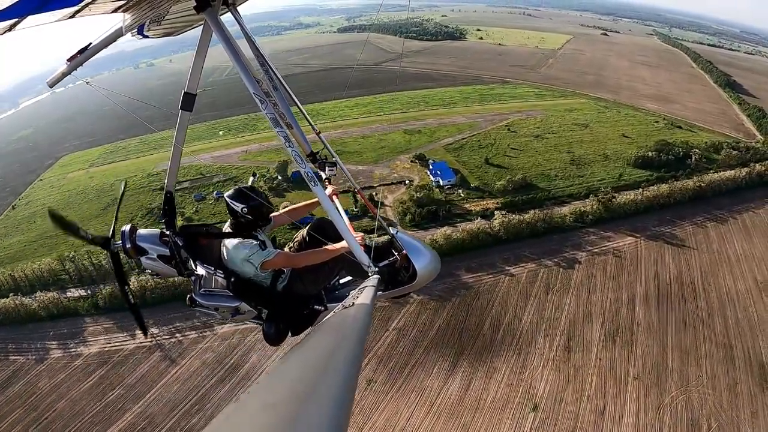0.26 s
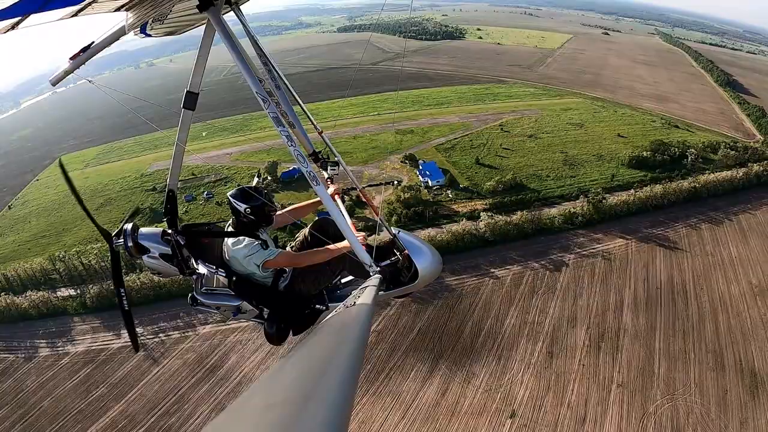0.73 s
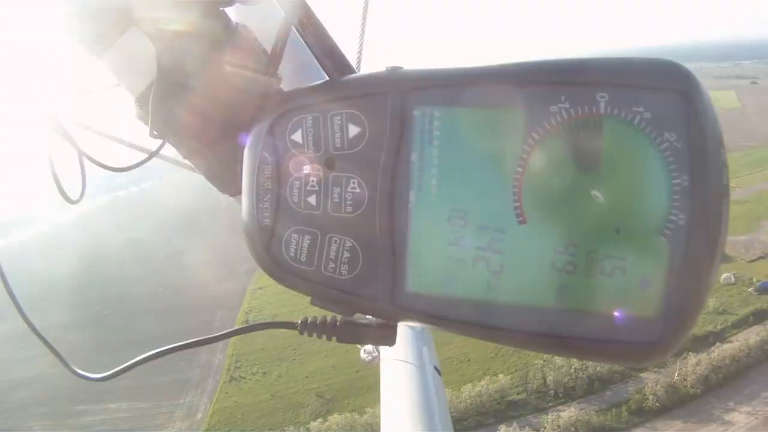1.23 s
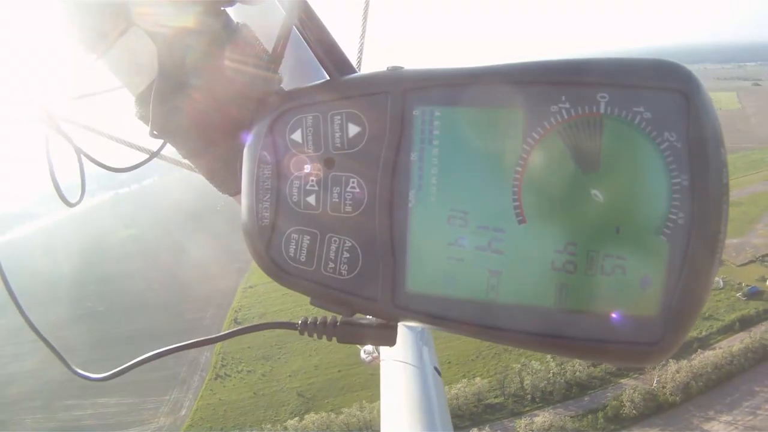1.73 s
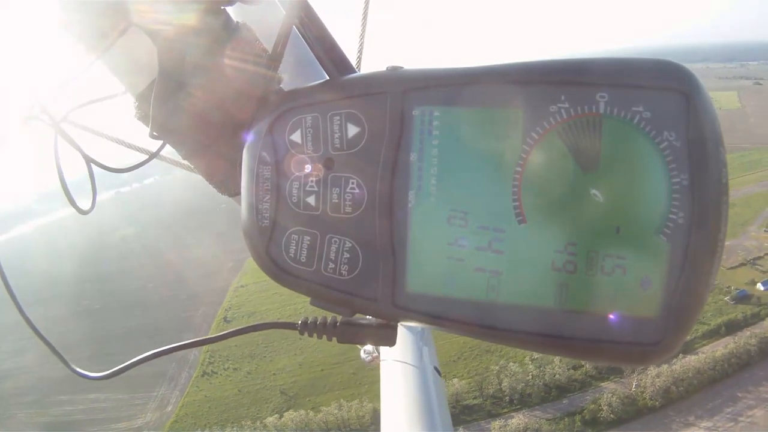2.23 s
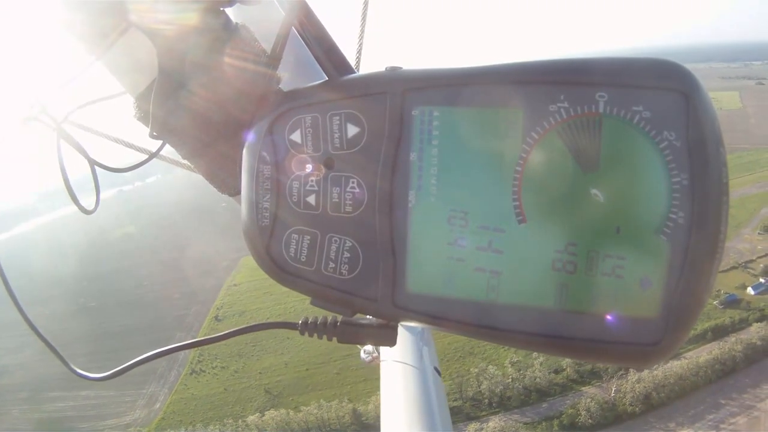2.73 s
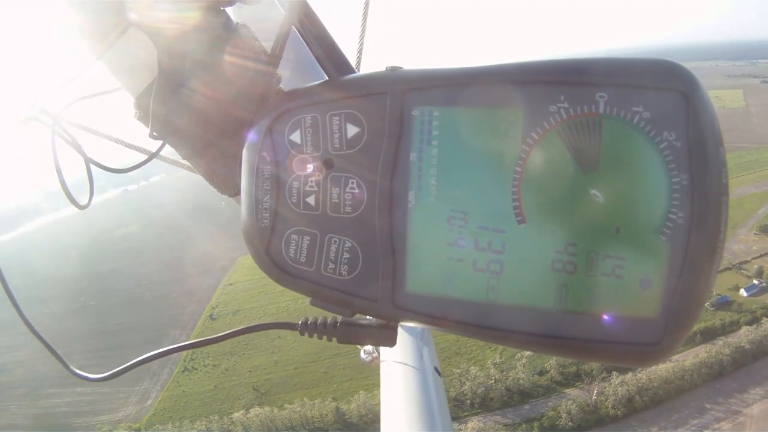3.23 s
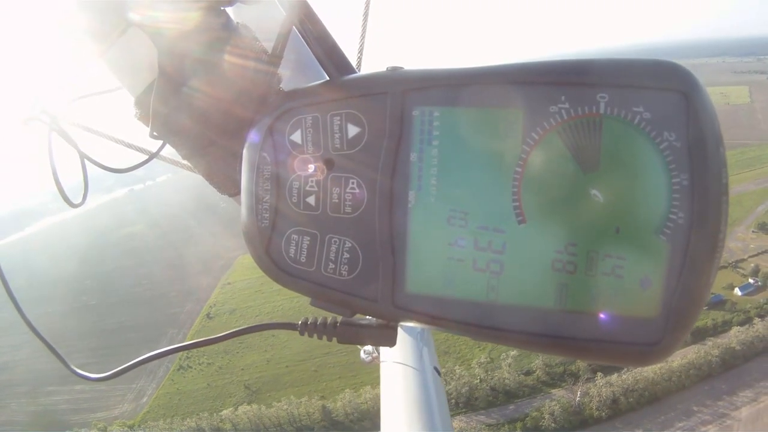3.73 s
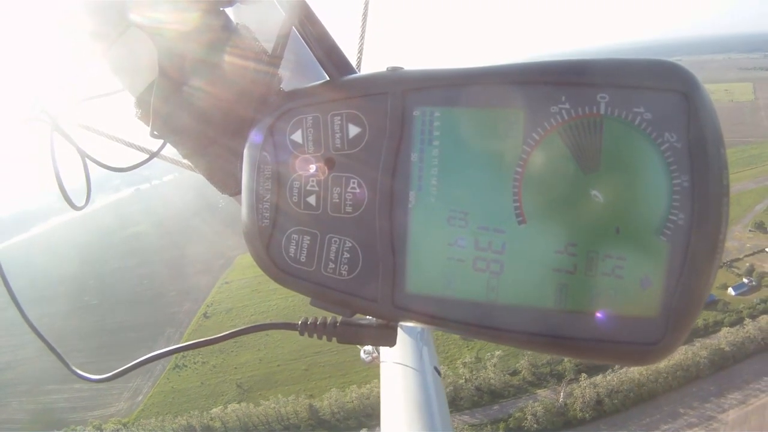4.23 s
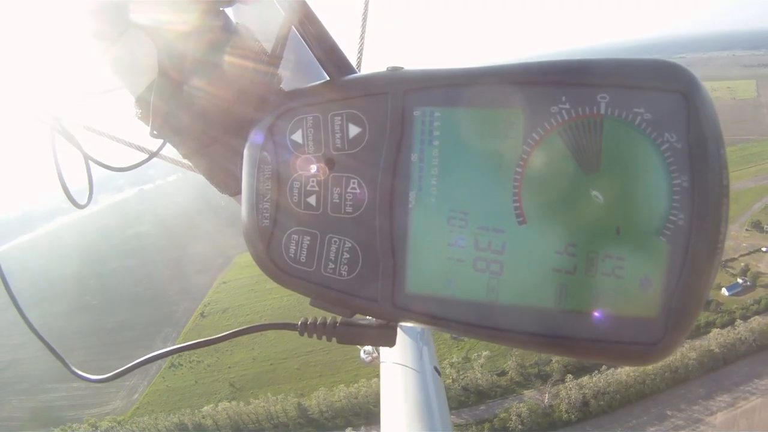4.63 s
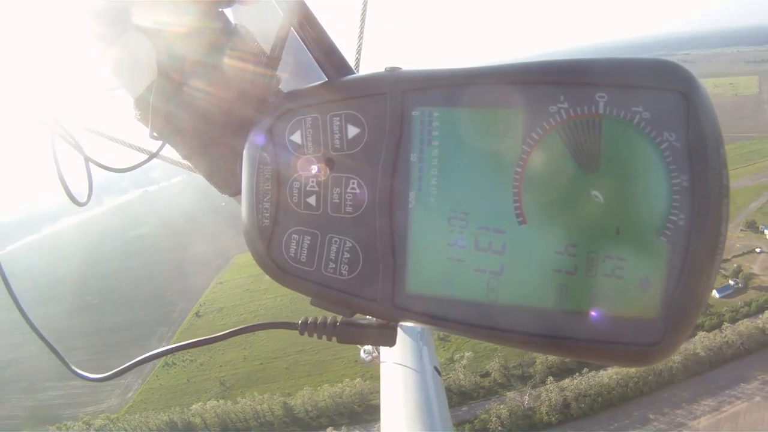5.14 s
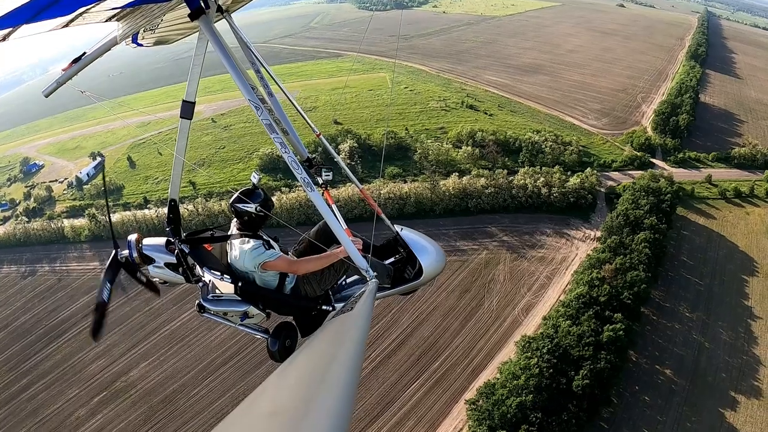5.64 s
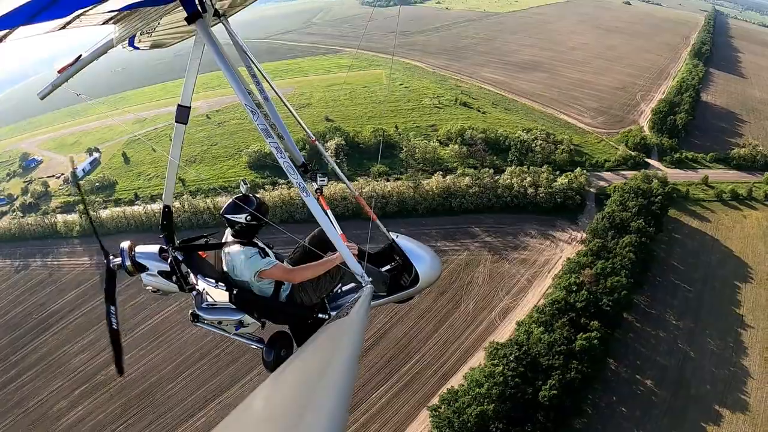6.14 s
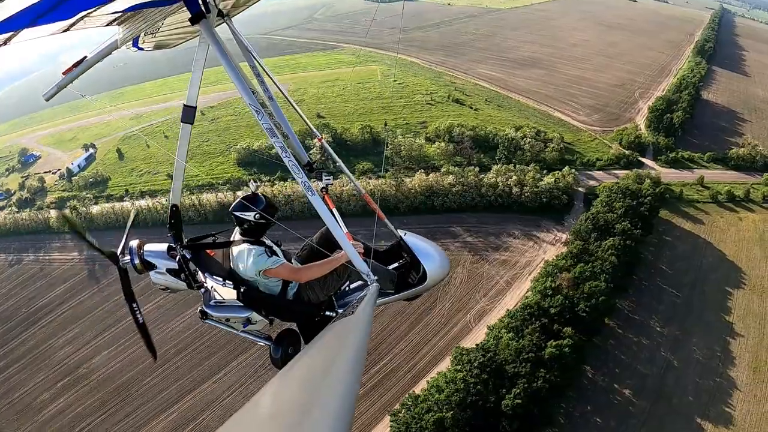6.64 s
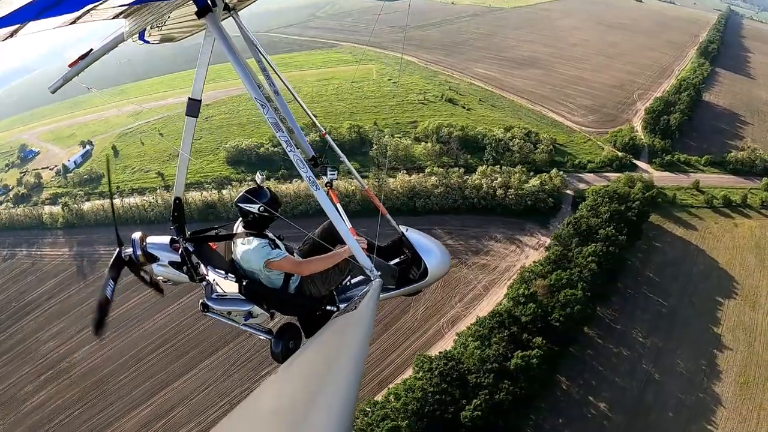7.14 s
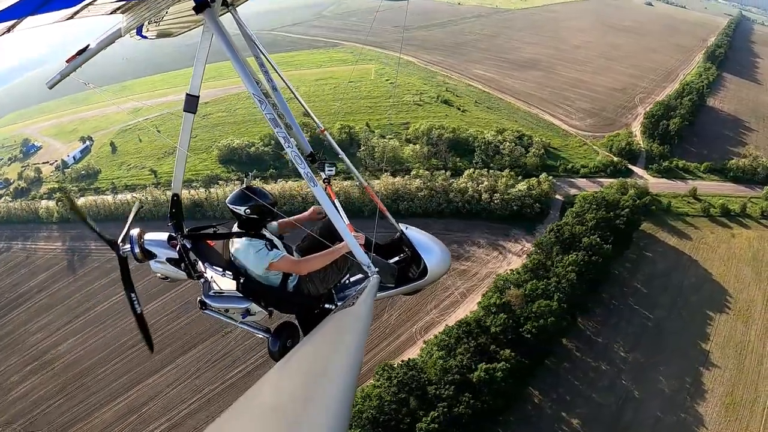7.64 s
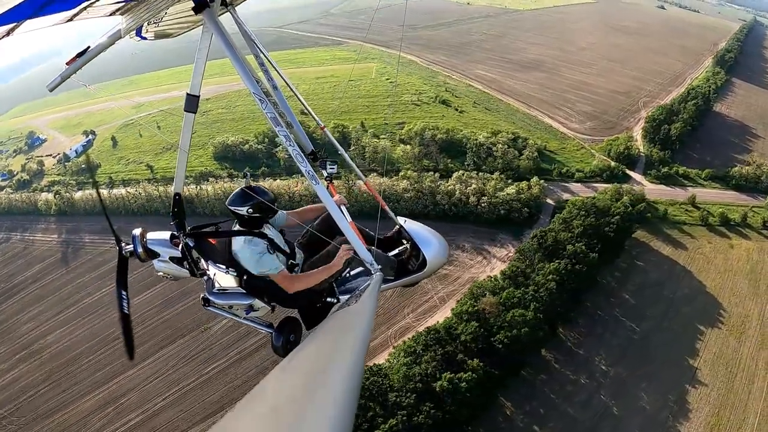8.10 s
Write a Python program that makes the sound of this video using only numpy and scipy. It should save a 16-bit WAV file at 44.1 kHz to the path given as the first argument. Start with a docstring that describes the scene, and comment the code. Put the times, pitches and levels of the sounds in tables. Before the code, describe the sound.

Low, rasping wind overwhelms a microphone out on the wing, with a low unsteady thrum. An abrupt cut moves close to the cockpit, much quieter, where the motor pulses rapidly beneath gritty hiss, brief low hoots and short runs of mount rattle. Another hard cut brings back the loud buffeting, gusty and crackling, with sharp air slaps until the end.

```python
"""A motorised hang-glider trike in flight, heard from the wing, then the cockpit, then the wing again.
Out on the wing, gusts swell the 2 to 4 kHz rasp of octave-band noise; bursts slap, pops crackle, a tone thrums.
In the cockpit, cosines make the propeller shake and the throbbing drive; noise makes rumble, hiss and buzz.
A wavering drone hoots there and a mount rattles in decaying modes; sample-and-hold adds a bright fizz.
Back on the wing the buffeting returns, with hard slaps and one thin tick."""
import sys
import numpy as np
from scipy import signal
from scipy.fft import rfft, irfft, next_fast_len
from scipy.io import wavfile
from scipy.ndimage import uniform_filter1d, minimum_filter1d

SR = 44100
rng = np.random.default_rng(int(sys.argv[2]) if len(sys.argv) > 2 else 0)


def transcribe(u):
    """Save the signal u as a 16-bit wav file named by the first command-line argument.

    u: samples, shape (n,) or (channels, n), limited to [-1, 1]; the rate is SR.
    q: integer samples, one column per channel.
    """
    v = np.clip(np.atleast_2d(u).T, -1, 1)
    q = np.round(v * 32767).astype(np.int16)
    wavfile.write(sys.argv[1], SR, q)


N = 369116

TIME = np.arange(N) / SR
FFT_SIZE = next_fast_len(N, True)
FREQ = np.maximum(np.arange(FFT_SIZE // 2 + 1) * SR / FFT_SIZE, 1)


def from_db(db):
    """Decibels to gain."""
    return 10 ** (np.asarray(db) / 20)


def rms_one(x):
    """Scale to unit rms."""
    return x / np.sqrt(np.mean(x ** 2) + 1e-20)


def in_time(rows):
    """One curve over time per value column of a table."""
    s, *columns = np.transpose(rows)
    return [np.interp(TIME, s, c) for c in columns]


def at_hz(points, hz):
    """Read a table on a log-frequency axis."""
    f, value = np.transpose(points)
    return np.interp(np.log(hz), np.log(f), value)


def noise(gain):
    """Noise of rms 1, shaped by a gain at each frequency."""
    spectrum = rfft(rng.standard_normal(FFT_SIZE))
    return rms_one(irfft(spectrum * gain, FFT_SIZE)[:N])


def drift(rate_hz):
    """Random wavering of spread 1, mostly slower than rate_hz."""
    return noise(1 / (1 + (FREQ / rate_hz) ** 2))


def humps(modes):
    """Summed power response of a set of resonances."""
    return sum(from_db(db) ** 2 / (1 + ((FREQ - hz * hz / FREQ) / width) ** 2) for hz, width, db in modes)


def cut(x, hz, kind, order=2):
    """Butterworth filter."""
    sections = signal.butter(order, hz, kind, fs=SR, output="sos")
    return signal.sosfilt(sections, x + 1e-18)


def bursts(rows, t60):
    """Puffs of noise that start at each (s, dB) and fall by 60 dB in t60 seconds."""
    starts = np.zeros(N)
    for s, db in rows:
        starts[round(s * SR)] = from_db(db)
    envelope = signal.lfilter([1], [1, -from_db(-60 / (t60 * SR))], starts + 1e-18)
    return envelope * rng.standard_normal(N)


def add(out, s, sound):
    """Mix a short sound in at time s."""
    i = round(s * SR)
    out[i:i + len(sound)] += sound[:N - i]


def swells(rows, half_width_s):
    """Gain that rises and falls in a bell around each (s, dB); overlapping bells add in power."""
    t = TIME[::100]
    power = sum(from_db(db) ** 2 * np.exp(-((t - s) / half_width_s) ** 2) for s, db in rows)
    return np.interp(TIME, t, np.sqrt(power))


def crackle(per_s, spread_db):
    """Single tiny eddies pop on the port at random, in random sizes and either polarity."""
    sizes = from_db(spread_db * np.minimum(rng.exponential(1, N), 3)) * rng.choice([-1, 1], N)
    pops = sizes * (rng.random(N) < per_s / SR)
    return rms_one(cut(cut(pops, 2200, "high"), 3900, "low", order=5))


def vortices():
    """Air breaking away from the housing thrums at an unsteady low pitch."""
    # central pitch of the shed vortices [t/s, f/Hz]
    vortex_pitch = [(0, 108), (1.1, 116), (5.8, 108), (6.25, 128), (6.5, 175), (6.75, 120), (7.65, 101),
                    (8.35, 120)]
    phase = 2 * np.pi * np.cumsum(in_time(vortex_pitch)[0]) / SR + 1.35 * drift(rate_hz=17.6)
    return from_db(-20.5 + 2 * drift(rate_hz=14)) * np.sin(phase)


def wind(flow_db):
    """Turbulence: gusts swell the rasp around 2 to 4 kHz, the lowest and highest registers dip; eddies chop it."""
    # relative spectrum of the turbulence [f/Hz, level per Hz/dB]
    wind_spectrum = [(10, -19), (25, -8), (60, -2), (112, 0), (170, -7), (300, -11.5), (750, -13),
                     (1200, -17.5), (2000, -26.5), (4200, -44.5), (6000, -57.5), (8300, -66.5),
                     (11000, -81), (13000, -105)]
    # how deeply small eddies chop the wind, all registers in common [f/Hz, depth per unit of eddy swing/dB]
    chop_depth = [(100, 1.5), (600, -0.5), (1500, 2), (3500, 4.5), (6000, 2), (10000, -1.5)]
    # how each register answers the airflow; negative ones dip in a gust
    # [f/Hz, level change per dB of airflow/dB]
    gust_response = [(120, -0.37), (600, 0), (1200, 0.06), (2000, 0.96), (4000, 1.15), (9000, -1.4)]
    flow = rfft(noise(from_db(at_hz(wind_spectrum, FREQ))), FFT_SIZE)
    eddies = 0.58 * drift(rate_hz=56) + 0.78 * drift(rate_hz=350)
    turbulence = 0
    for hz in 2. ** np.arange(4, 15):
        band = np.maximum(1 - abs(np.log2(FREQ / hz)), 0)  # triangles that overlap by an octave
        octave = irfft(flow * band, FFT_SIZE)[:N]
        gust_gain = from_db(at_hz(gust_response, hz) * flow_db)
        chop_gain = rms_one(from_db(at_hz(chop_depth, hz) * eddies))
        turbulence = turbulence + octave * gust_gain * chop_gain
    pops = from_db(2.0 * flow_db - 57) * crackle(per_s=70, spread_db=5.5)
    return from_db(-15) * turbulence + pops + vortices()


def slaps(flow_db):
    """The hardest eddies crack on the port as filtered noise bursts; once something ticks thinly."""
    # hardest slaps of air on the microphone [t/s, burst level before filters and make-up gain/dB]
    hard_slaps = [(5.7151, -27), (6.0725, -17), (6.1456, -24), (6.2948, -18), (6.8445, -18), (8.0468, -28),
                  (8.178, -28)]
    # the thin tick on the wing [t/s, burst level before filters and trim/dB]
    ticks = [(7.123, -40)]
    light_per_s, light_db, light_spread_db = 12, -35, 1.5  # rate at the usual airflow, more in a gust
    times = TIME[rng.random(N) < light_per_s * from_db(2 * flow_db) / SR]
    levels_db = light_db + light_spread_db * rng.standard_normal(len(times))
    all_slaps = list(hard_slaps) + list(zip(times, levels_db))
    cracks = cut(cut(bursts(all_slaps, t60=.01), 1500, "high"), 3300, "low", order=3)
    tick = cut(cut(bursts(ticks, t60=0.032), 4000, "high"), 10500, "low", order=10)
    return from_db(6) * cut(cracks, 8500, "low", order=8) + from_db(-2) * tick


def propeller(turns):
    """Unbalance shakes the frame once a turn; blade passes and firing hum above it."""
    # shake at the turning rate [t/s, rms level/dB]
    shake_level = [(1.2, -25.5), (2.0, -25.5), (2.27, -29.5), (2.45, -26), (2.68, -39), (2.85, -28),
                   (3.55, -26), (3.95, -29), (5.25, -29.5)]
    # pitches of the hum [multiple of the propeller speed]
    tone_orders = [2, 3, 4.93]
    # central rms levels of those tones [level/dB]
    tone_levels = [-42.5, -55, -49.5]
    out = from_db(in_time(shake_level)[0]) * np.cos(2 * np.pi * turns)
    for order, db in zip(tone_orders, tone_levels):
        level = from_db(db + 2.7 * drift(rate_hz=2.5))
        out = out + level * np.cos(2 * np.pi * order * turns + 0.6 * drift(rate_hz=4.1))
    return np.sqrt(2) * out  # rms to peak


def drive(turns, speed):
    """Close lines of the reduction drive churn, then fall into step every third propeller turn and throb."""
    # lines on successive thirds of the propeller speed
    # [rms level at the highest speed/dB, rms level at the lowest speed/dB]
    drive_lines = [(-45.5, -49), (-68, -69), (-43.5, -66), (-62, -61), (-66, -54.5), (-50.5, -51),
                   (-69, -54.5), (-60, -69), (-73, -62)]
    # how far the lines are out of step, scaled up by line number below [t/s, phase/rad]
    slip_curve = [(1.2, 0.72), (2.7, 0.47), (3.7, 0.015)]
    in_step_s = 4.28  # a moment when the cycle starts afresh
    cycle = 2 * np.pi * (turns - np.interp(in_step_s, TIME, turns)) / 3
    slowed = (speed.max() - speed) / np.ptp(speed)  # 0 at the highest speed, 1 at the lowest
    slip, out = in_time(slip_curve)[0], 0
    for k, (fast_db, slow_db) in enumerate(drive_lines, 37):  # k cycles every three turns
        lag = slip * (k - 37) * (k - 42)
        level_db = fast_db + slowed * (slow_db - fast_db) + 1.6 * drift(rate_hz=2.0)
        out = out + from_db(level_db) * np.cos(k * cycle + lag)
    return np.sqrt(2) * out  # rms to peak


def frame(turns, knocks):
    """Tubes and panel carry engine noise that pulses each turn; the panel buzzes harder around a knock."""
    # relative spectrum of the cabin rumble [f/Hz, level per Hz/dB]
    rumble_spectrum = [(30, 5), (60, -1.5), (85, -1.5), (112, -0.5), (135, -0.5), (160, -3), (200, 0.5),
                       (250, -2), (310, -6.5), (400, -8), (480, -15.5), (650, -14)]
    # relative spectrum of the engine hiss [f/Hz, level per Hz/dB]
    hiss_spectrum = [(500, -29), (800, -14), (1300, -11), (1700, -6.5), (2200, -3), (2700, -5), (3100, -11),
                     (3400, -9), (3830, -13.5), (4130, -9), (4700, -18), (5400, -14.5), (5900, -17)]
    # resonances of the frame [f/Hz, width/Hz, level relative to the hiss/dB]
    frame_modes = [(724, 38, 10), (1497, 11.4, 12.5), (2120, 180, 5), (3587, 160, 8.5), (3970, 72, 2)]
    # resonances of the panel [f/Hz, width/Hz, relative level before the contrast power/dB]
    panel_modes = [(910, 71, 1), (990, 150, -2.5), (1085, 89, 3), (1190, 60, -1)]
    rest_db, kick_db, swell_s = -44, -15, 0.059  # buzz at rest; kick relative to a knock; its half-width
    pulsing = from_db(0.29 * np.cos(2 * np.pi * turns) + 0.77 * drift(rate_hz=120))
    resonance = np.sqrt(1 + humps(frame_modes))
    hiss = from_db(-33) * noise(from_db(at_hz(hiss_spectrum, FREQ)) * resonance * (FREQ > 400))
    buzz_gain = np.hypot(from_db(rest_db), from_db(kick_db) * swells(knocks, swell_s))
    buzz = buzz_gain * noise(humps(panel_modes) ** 0.8)
    rumble = noise(from_db(at_hz(rumble_spectrum, FREQ)) * (FREQ < 700))
    rumble = cut(cut(rumble, 710, "low"), 27, "high")
    return pulsing * (hiss + buzz) + from_db(-38.5) * rumble


def drone():
    """One wavering low note of the frame that swells into brief hoots."""
    # brief swells of the drone [t/s, peak level/dB]
    hoots = [(1.49, -36.5), (2.54, -36), (2.92, -43), (3.74, -38.5), (3.89, -34.5), (4.45, -39.5),
             (4.88, -41.5)]
    drone_hz, drone_db, waver_db, hoot_s = 193, -48, 2, .04  # hoot_s: half-width of a hoot
    steady = from_db(drone_db + waver_db * drift(rate_hz=5.9))
    level = np.hypot(steady, swells(hoots, hoot_s))
    return level * np.sin(2 * np.pi * drone_hz * TIME + 1.0 * drift(rate_hz=8.3))


def rattle(speed):
    """The knocks of every run as (s, dB): a propeller turn apart and dying away."""
    # short runs of knocks [t/s, count of knocks, strength of the first before mount gains/dB]
    runs = [(1.185, 3, -32.5), (1.195, 1, -25.5), (1.847, 4, -32.5), (2.024, 1, -32), (2.207, 1, -28),
            (2.744, 3, -31), (2.848, 1, -30.5), (2.963, 1, -29), (3.499, 5, -31), (4.698, 1, -37),
            (4.808, 2, -34.5)]
    knock_loss_db = 0.4  # each knock of a run is weaker than the last
    knocks = []
    for s, count, db in runs:
        turn_s = 1 / np.interp(s, TIME, speed)
        knocks += [(s + k * turn_s, db - knock_loss_db * k) for k in range(round(count))]
    return knocks


def mount(knocks):
    """Each knock is a brief gritty scuff that sets the modes of the mount ringing; hard ones ring the most."""
    # modes of the mount [f/Hz, relative level/dB, t60/s]
    mount_modes = [(1070, -21, 0.045), (1500, -1.5, 0.026), (1770, -1.5, 0.022), (1900, -4.5, 0.022),
                   (2090, -4, 0.033), (3600, -22, .012)]
    out, t = np.zeros(N), TIME[:SR // 10]
    usual_db = np.mean(knocks, axis=0)[1]
    colours = rng.standard_normal((len(knocks), len(mount_modes)))  # varies level and phase of each mode
    for (s, db), colour in zip(knocks, colours):
        ring = 0
        for (hz, level, t60), c in zip(mount_modes, colour):
            ring = ring + from_db(level + c - 60 * t / t60) * np.sin(2 * np.pi * hz * t + 2 * c)
        strength = from_db(db + 9 + .5 * (db - usual_db))
        attack = 1 - np.exp(-t / 0.0015)
        add(out, s, strength * ring * attack)
    scuff = cut(cut(bursts(knocks, t60=0.045), 1350, "high", order=4), 2170, "low", order=4)
    return out + from_db(13) * scuff


def sample_and_hold(x):
    """Staircase sampling mirrors the sound into the treble, around the sampling rate."""
    hold_hz = 12000
    coarse = signal.resample_poly(cut(x, 5800, "low", order=16), hold_hz, SR)
    staircase = np.repeat(coarse, 4)
    return signal.resample_poly(staircase, SR, 4 * hold_hz)[:N]


def scene():
    """The wing microphone, then the sheltered cockpit one by the instrument, then the wing again."""
    # strength of the airflow over the wing microphone [t/s, level above the usual/dB]
    airflow = [(0, -2), (.52, -.5), (1.1, -2), (5.3, -1), (5.45, -2), (5.75, 3), (5.93, 2), (6.08, 3),
               (6.42, -0.5), (6.7, 1), (6.85, -2), (7.1, 2), (7.56, -3.5), (7.78, 1), (8.1, 3.5),
               (8.36, -0.5)]
    # propeller speed [t/s, speed/(turns/s)]
    propeller_speed = [(1.2, 28.68), (1.7, 28.52), (2.5, 28.14), (3.3, 27.8), (4.1, 27.5), (4.5, 27.33),
                       (5.2, 27.38)]
    to_cockpit_s, to_wing_s = 1.122, 5.293
    flow_db = in_time(airflow)[0] + 1 * drift(rate_hz=15)  # quick random unevenness, spread 1 dB
    wing = wind(flow_db) + slaps(flow_db)

    speed = in_time(propeller_speed)[0]
    turns, knocks = np.cumsum(speed) / SR, rattle(speed)
    machine = propeller(turns) + drive(turns, speed)
    cockpit = sample_and_hold(machine + frame(turns, knocks) + drone() + mount(knocks))

    fade_in = np.clip((TIME - to_cockpit_s) / 0.0012, 0, 1)
    fade_out = np.clip((to_wing_s - TIME) / 0.0031 + 1, 0, 1)
    inside = fade_in * fade_out
    return (inside * cockpit + (1 - inside) * wing)[None]


def record(dry):
    """A limiter with a short hold evens out the buffeting; the ends are eased and the top is cut."""
    headroom = np.minimum(1, 0.47 / (abs(dry) + 1e-9))
    held = minimum_filter1d(headroom, size=1100)
    gain = uniform_filter1d(uniform_filter1d(held, size=600), size=600)
    to_nearest_end = np.minimum(TIME, TIME[-1] - TIME)
    ends = np.sin(np.pi / 2 * np.minimum(1, to_nearest_end / .003)) ** 2
    top_cut = signal.ellip(12, .1, 90, 15300, fs=SR, output="sos")  # steep low-pass at 15.3 kHz
    return signal.sosfilt(top_cut, dry * gain * ends)


dry = scene()
out = record(dry)
transcribe(out)
```